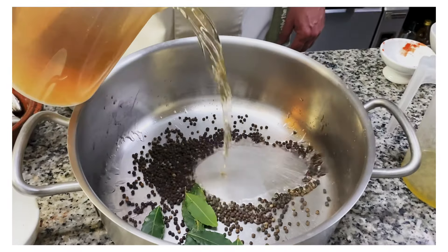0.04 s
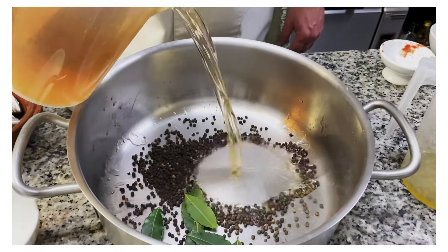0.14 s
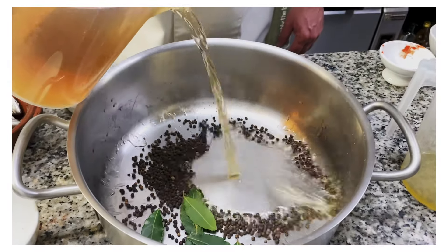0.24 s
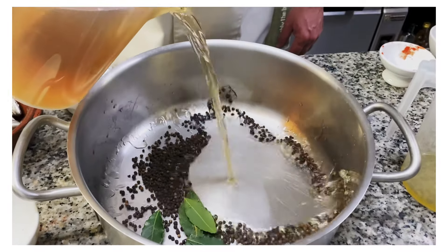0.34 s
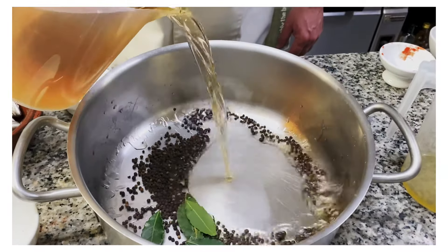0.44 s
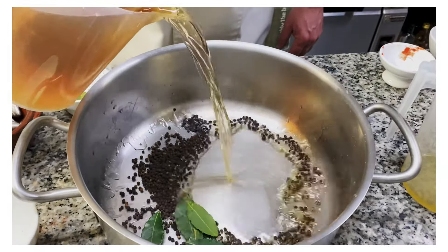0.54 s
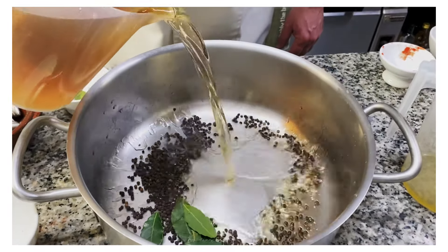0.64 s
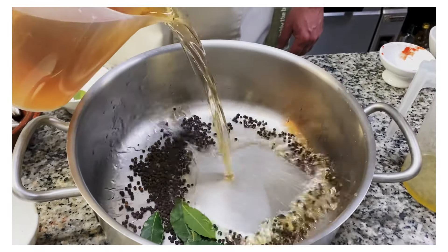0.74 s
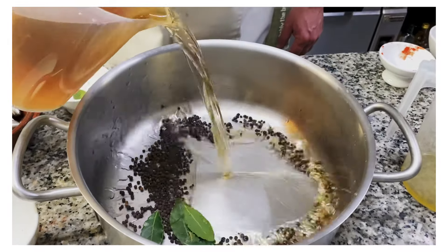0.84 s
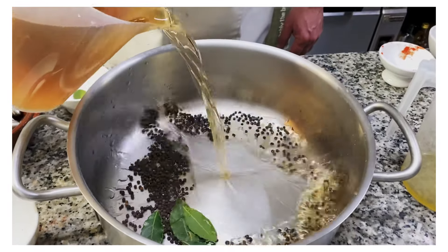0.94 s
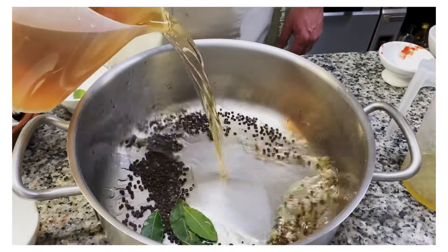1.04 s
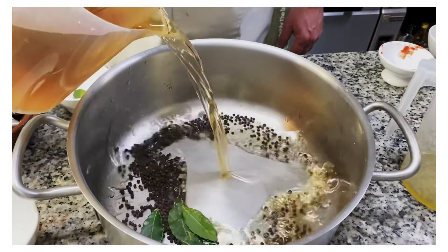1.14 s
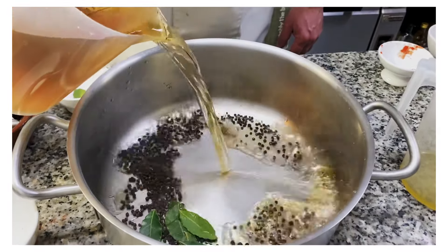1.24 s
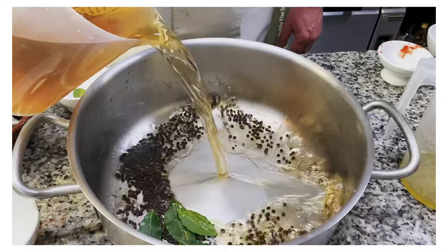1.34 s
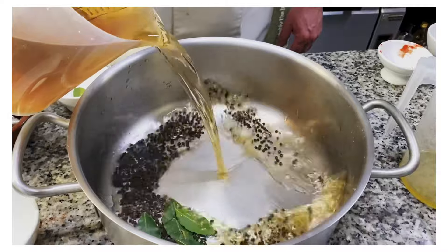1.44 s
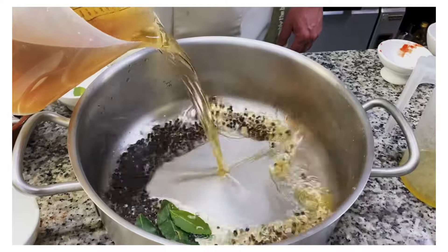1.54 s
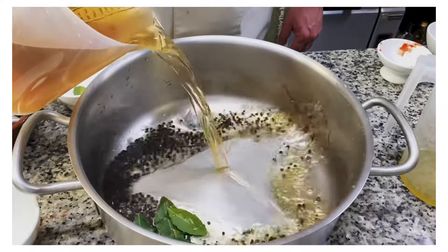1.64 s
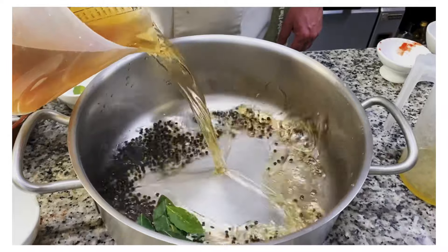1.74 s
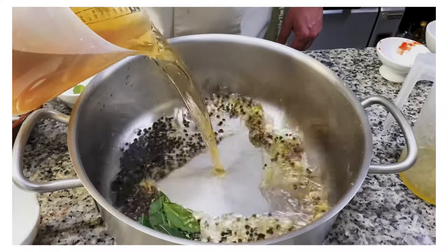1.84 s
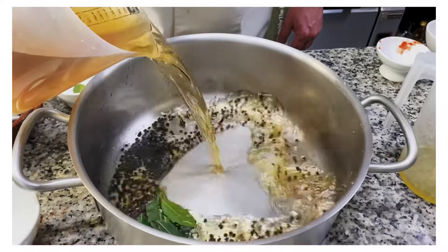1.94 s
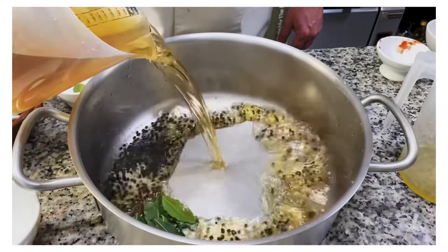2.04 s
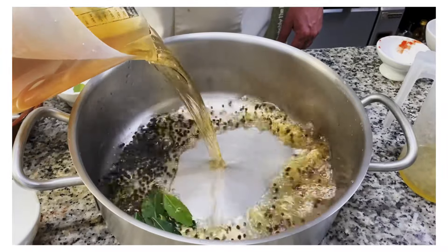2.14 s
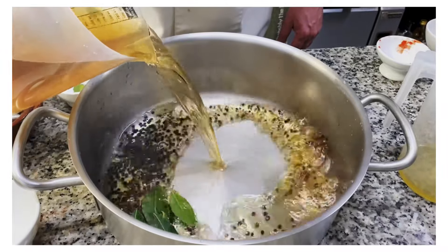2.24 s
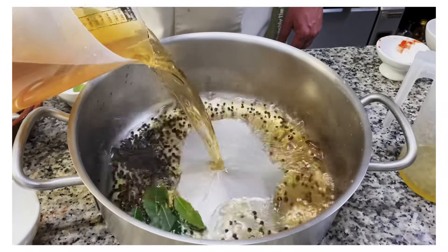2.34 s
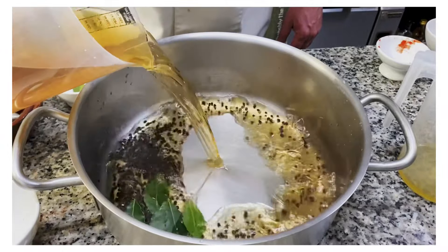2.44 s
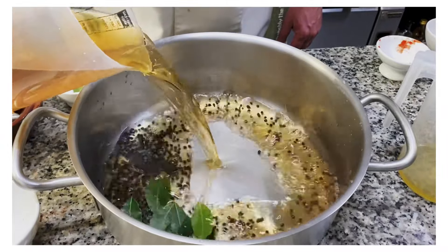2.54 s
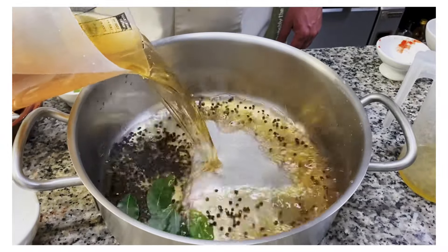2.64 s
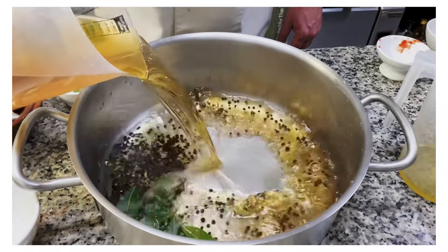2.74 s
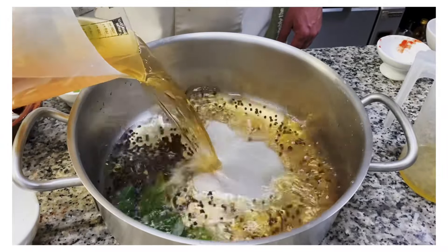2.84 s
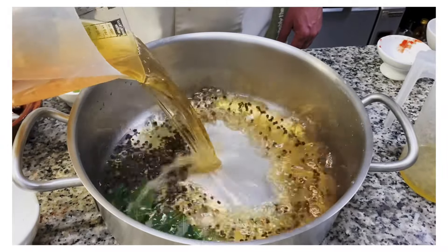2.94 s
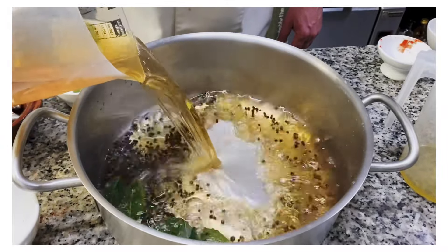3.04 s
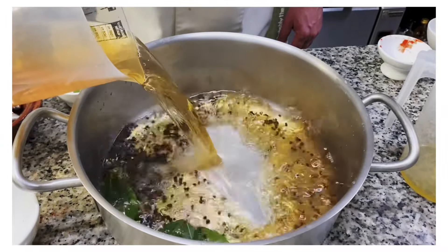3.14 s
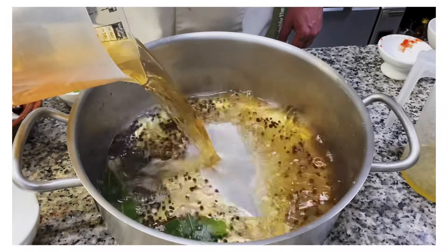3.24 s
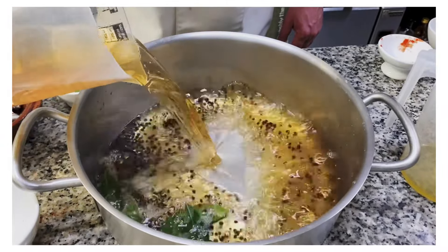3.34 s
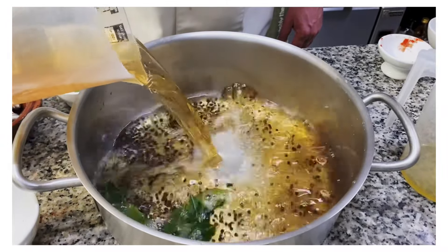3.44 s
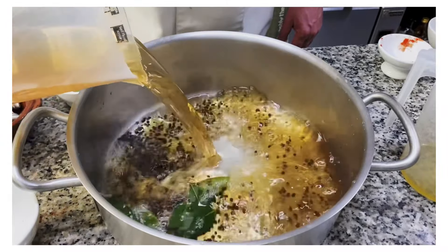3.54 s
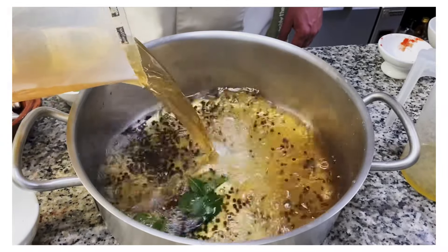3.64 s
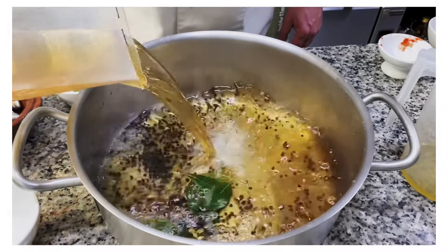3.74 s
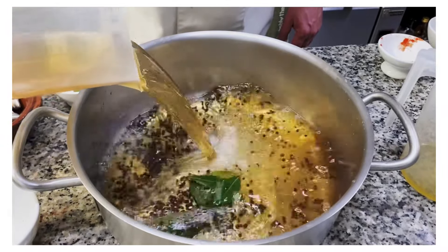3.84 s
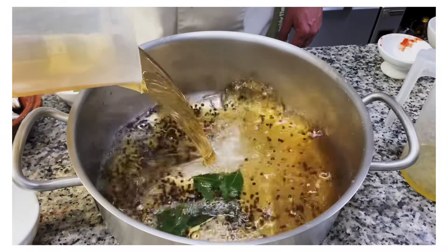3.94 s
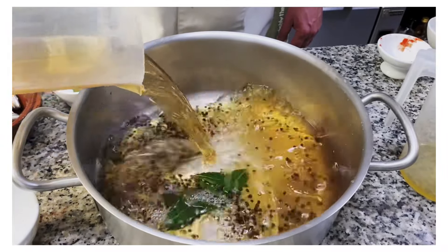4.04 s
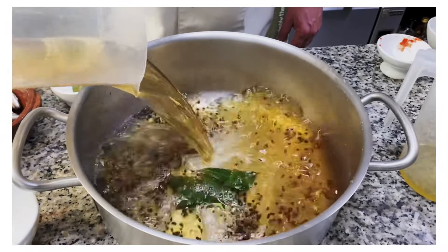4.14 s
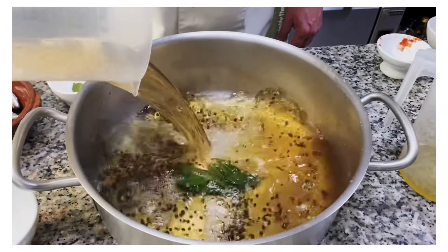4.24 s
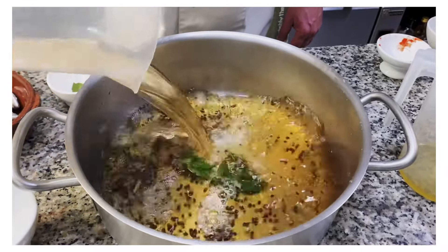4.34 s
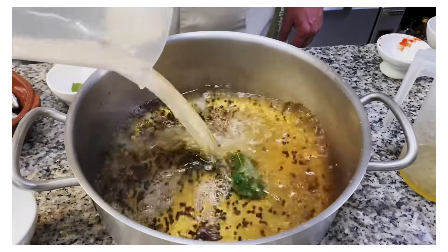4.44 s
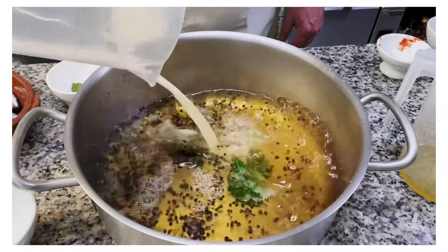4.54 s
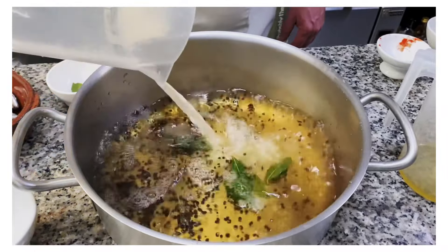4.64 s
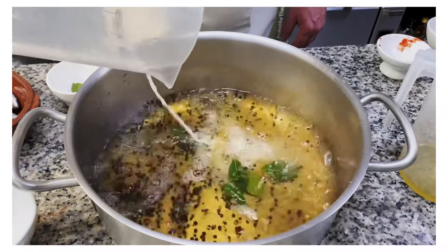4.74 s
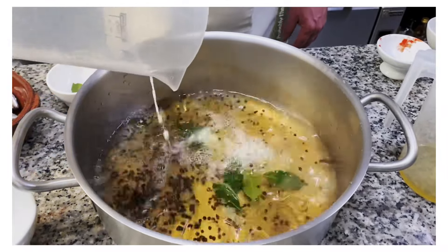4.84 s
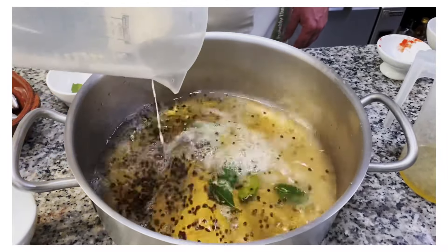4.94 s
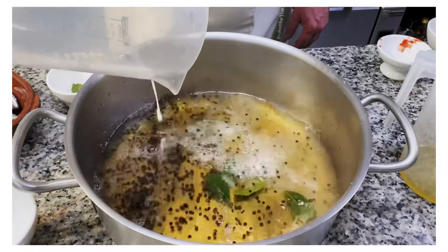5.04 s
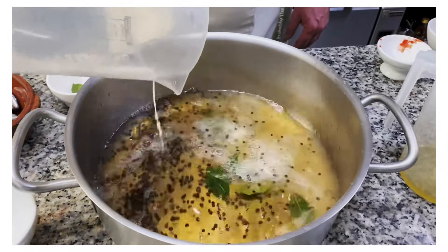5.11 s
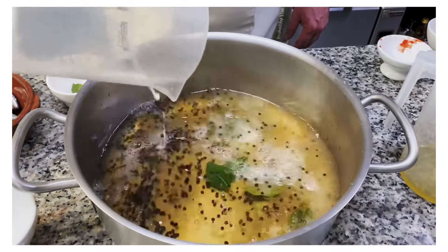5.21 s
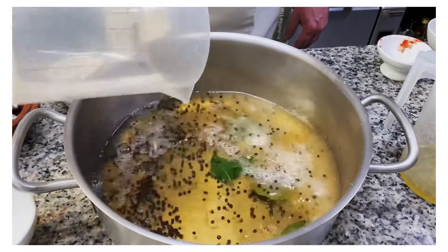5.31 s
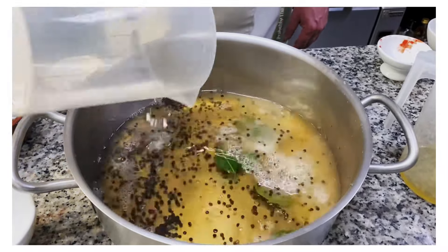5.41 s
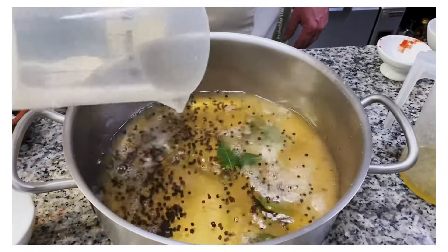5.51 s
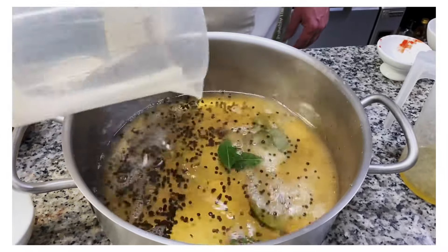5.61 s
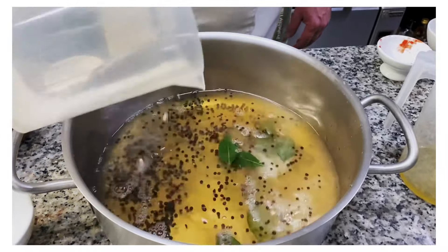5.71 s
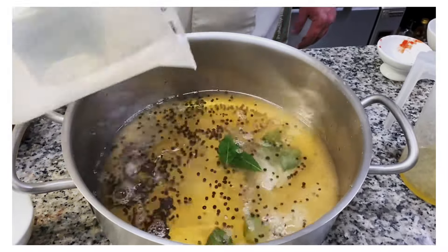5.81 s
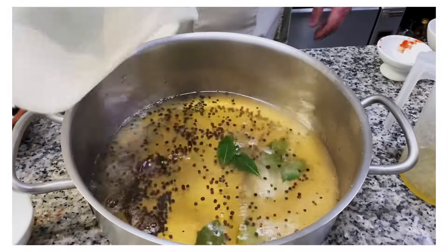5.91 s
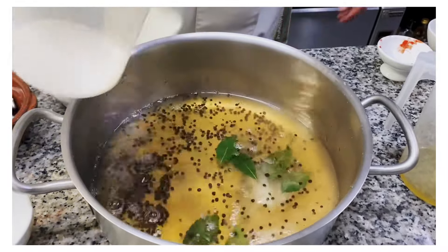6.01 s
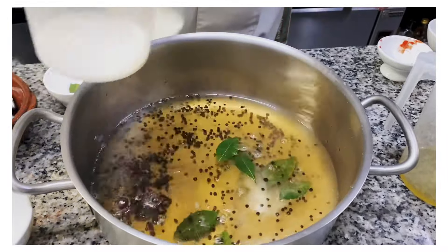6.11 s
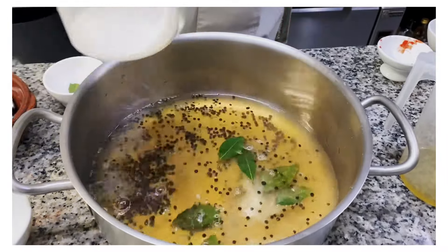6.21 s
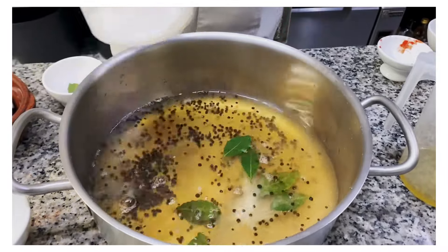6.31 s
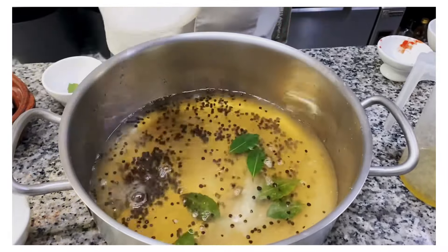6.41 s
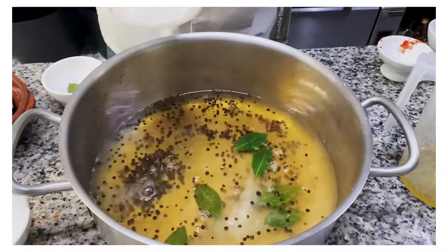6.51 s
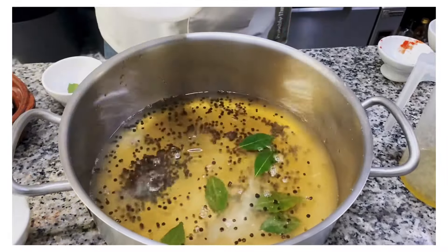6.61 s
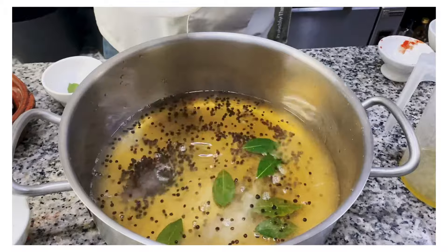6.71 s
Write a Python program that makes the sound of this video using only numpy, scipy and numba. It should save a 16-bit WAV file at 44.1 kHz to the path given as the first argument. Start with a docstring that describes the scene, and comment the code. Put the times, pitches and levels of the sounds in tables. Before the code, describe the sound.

Close, phone-like stereo pickup in a kitchen with quiet low rumble and dull air. Almost silent at first; from about 0.15 s liquid hits a bare steel pot with sharp plinks and a bright, thin sizzle. It dips around 0.4-0.6 s, then runs unevenly, with single bubbles chirping and plopping, notably near 0.75 and 1.3 s, and slight hollow pot ringing. It thins around 2.5 s. From 2.7 s the pour swells and, as a pool forms, becomes a thick, splashing gurgle with deep gulps around 3.0-3.3 s. It runs smoother around 3.8 s, then surges again at 4.3-4.7 s. A tiny high trill ends the stream by 4.85 s; scattered drips tick afterwards. A dull rub leads to a light knock at 5.15 s with a short wavering ring. Faint foam fizz fades, rising slightly at the end, with weak rubs near 6.4 and 6.7 s.

```python
"""A bright hiss, then a thick gurgle: vinegar is poured from a jug into a steel pot, heard close by.
Swarms of decaying sines, each a ringing air bubble, make the hiss, gurgle, last trill and foam fizz.
Single bubbles and noise-burst drops stand out, and resonant filters add the air modes of the pot.
A light modal knock and dull rubs on a phone's case follow, the foam fizzes on, and filtered noise
makes the low room rumble and kitchen air. Random echo tails stand for the walls and the kitchen."""
import sys
import numpy as np
from scipy import signal
from scipy.fft import rfft, irfft, next_fast_len
from scipy.io import wavfile
from scipy.ndimage import uniform_filter1d
from numba import njit

SR = 44100
rng = np.random.default_rng(int(sys.argv[2]) if len(sys.argv) > 2 else 0)


def generate_wav(signal):
    """Clip the signal to [-1, 1] and save it as 16-bit WAV at the path in sys.argv[1]."""
    frames = np.transpose(np.atleast_2d(signal))
    scaled = np.clip(frames, -1, 1) * 32767
    pcm = np.round(scaled).astype(np.int16)
    wavfile.write(sys.argv[1], SR, pcm)


N = 298538
TIME = np.arange(N) / SR
SIZE = next_fast_len(N, True)
FREQS = np.fft.rfftfreq(SIZE, 1 / SR)

# the pour lands, thins, steadies, swells twice as the jug tips, and runs out;
# levels before trim and draining: time_s, spray_level_db, gurgle_level_db
STREAM = [(0, -53, -91), (.135, -55.5, -99), (.16, -43, -49.5), (.3, -39.5, -48.5), (.42, -48, -73),
          (.52, -52, -68), (.68, -50, -56.5), (.82, -44, -65.5), (1.28, -42.5, -50), (1.53, -46, -52.5),
          (1.88, -44, -44.5), (2.05, -48, -51.5), (2.58, -51.5, -50.5), (2.72, -41.5, -48),
          (2.87, -42.5, -44.5), (2.96, -36, -45), (3.04, -42.5, -42), (3.11, -36, -38), (3.16, -39.5, -44),
          (3.22, -40, -41), (3.35, -42.5, -43.5), (3.62, -42, -42), (3.85, -45.5, -47.5), (4.1, -42, -43),
          (4.36, -40.5, -39), (4.43, -42, -40.5), (4.51, -40, -43), (4.58, -53, -43.5), (4.64, -43.5, -43),
          (4.67, -47.5, -49.5), (4.72, -40.5, -48.5), (4.82, -69, -53), (4.85, -65.5, -71.5)]


def undb(db):
    """Level is logarithmic: 20 dB is a factor of ten in amplitude."""
    return 10 ** (np.asarray(db) / 20)


def curve(table, axis=1):
    """Linear interpolation turns one column of a time table into a control signal."""
    rows = np.array(table)
    return np.interp(TIME, rows[:, 0], rows[:, axis])


def across(points):
    """Interpolation on a log-frequency axis joins (Hz, value) points."""
    hz, value = np.transpose(points)
    return np.interp(np.log(FREQS + 1), np.log(hz), value)


def unit(x):
    """Normalization by root mean square gives rms 1."""
    return x / np.sqrt(np.mean(x ** 2))


def colour(x, points):
    """Spectral shaping: multiplication in the frequency domain filters a sound, here to rms 1."""
    spectrum = rfft(x, SIZE) * undb(across(points))
    return unit(irfft(spectrum, SIZE)[..., :N])


def walk(rate):
    """Low-pass random fluctuation: held random values, smoothed, with a spread near 1."""
    k = max(int(SR / rate), 1)
    steps = np.repeat(rng.standard_normal(N // k + 1), k)
    return np.sqrt(1.5) * uniform_filter1d(steps, k)[:N]


def add(out, s, sound):
    """Superposition: mix a short sound in at time s."""
    i = int(np.clip(s * SR, 0, N - 1))
    out[i:i + len(sound)] += sound[:N - i]


def bubble(hz, life, rise):
    """Damped volume oscillation: a trapped air pocket rings, climbing in pitch near the surface."""
    age = np.arange(int(6 * life * SR) + 2) / (life * SR)  # in lives
    pitch = np.minimum(hz * (1 + rise * age), SR / 2)
    envelope = (1 - np.exp(-4 * age)) * np.exp(-age)
    return envelope * np.sin(2 * np.pi * np.cumsum(pitch) / SR)


@njit
def ring_all(start, hz, gain, life, rise):
    """Rotating phasors: sum many bubbles, each swelling, climbing in pitch and dying away."""
    out = np.zeros(N)
    for k in range(len(start)):
        step = 1 / (life[k] * SR)
        turn = np.exp(2j * np.pi * hz[k] / SR - step)
        climb = np.exp(2j * np.pi * hz[k] / SR * rise[k] * step)
        z, closed, opening = gain[k] + 0j, 1., np.exp(-4 * step)
        for i in range(start[k], min(start[k] + int(6 / step), N)):
            out[i] += (1 - closed) * z.imag
            z, turn, closed = z * turn, turn * climb, closed * opening
    return out


def swarm(count, low_hz, high_hz, cycles, rise, spread_db):
    """Random superposition: many bubbles of random size and time, ringing a few cycles; rms 1."""
    when, size, damping, glide, strength = rng.random((count, 5)).T
    hz = low_hz * (high_hz / low_hz) ** size
    gain = undb(-spread_db * np.log(strength + 0.0074)) * hz / high_hz
    life = cycles * (.5 + damping) / hz
    start = (when * N).astype(np.int64)
    return unit(ring_all(start, hz, gain, life, rise * (0.18 + glide)))


def resonate(x, modes):
    """Modal resonance: a hollow body adds ringing at its own frequencies to the sound."""
    ringing = sum(undb(db) * signal.lfilter(*signal.iirpeak(hz, hz / width, fs=SR), x)
                  for hz, width, db in modes)
    return x + ringing


def depth(t):
    """Sigmoid transition: share of the stream landing in liquid as the pool closes over the steel."""
    film_share, pool_share = 0.11, 0.7
    closes_s, closing_s = 2.76, 0.11
    closed = .5 + .5 * np.tanh((t - closes_s) / (2 * closing_s))
    return np.clip(film_share + (pool_share - film_share) * closed, 0, 1)


def by_depth(film, pool):
    """Power-preserving crossfade from the sound on bare steel to the sound in the pool."""
    share = depth(TIME)
    return np.sqrt(1 - share) * film + np.sqrt(share) * pool


def draining():
    """Exponential decay: the last thread of liquid dies away once the stream ends."""
    stream_end_s, drain_db_per_s = 4.73, 13.5
    return undb(-drain_db_per_s * np.maximum(TIME - stream_end_s, 0))


def spurts(count, life, spread_db):
    """Shot noise: lumps in the stream make a gain that jumps and falls back; rms 1."""
    when, strength = rng.random((count, 2)).T
    energy = undb(-spread_db * np.log(strength + 0.017)) ** 2
    lumps = np.bincount((when * N).astype(int), energy, N)
    return unit(np.sqrt(signal.lfilter([1], [1, -np.exp(-1 / (life * SR))], lumps)))


def spray():
    """Breakup into tiny resonators and noise: a bright sizzle on steel, a duller splash in the pool."""
    # spectrum on steel: frequency_hz, relative_db
    steel_colour = [(300, -32), (700, -18), (1500, -12), (3000, -4), (4500, 0), (5700, 0), (7000, -2.5),
                    (9000, -3), (11500, -6), (13000, -13), (14000, -20), (16000, -27)]
    # spectrum in the pool: frequency_hz, relative_db
    plunge_colour = [(300, -30), (700, -14), (1500, -6), (2500, 0), (3600, 1), (4500, 0), (6000, -3),
                     (7000, -6), (9000, -8), (11500, -13), (14000, -25), (16000, -35)]
    droplets = swarm(count=13000, low_hz=2200, high_hz=13000, cycles=5, rise=.07, spread_db=3.6)
    froth = swarm(count=12000, low_hz=1600, high_hz=12000, cycles=6, rise=.035, spread_db=2.3)
    hiss = undb(-9) * rng.standard_normal((2, N))
    sizzle = colour(droplets + hiss[0], steel_colour)
    plunge = colour(froth + hiss[1], plunge_colour)
    return by_depth(sizzle, plunge) * undb(curve(STREAM, axis=1) + 1.5) * draining()


def gurgle():
    """Air entrainment: dragged-under bubbles chirp in the thin film, crowd the pool, grow in a surge."""
    # spectrum of the smaller bubbles: frequency_hz, relative_db
    gurgle_colour = [(300, -31), (550, -15.5), (800, -6.5), (1300, 0), (2000, 3.5), (3000, 0.5),
                     (4500, -20), (8000, -31)]
    # deep bubbles come with the surges and the last gush; before trim and draining: time_s, level_db
    gulp_levels = [(0, -78), (2.6, -59.5), (2.86, -54), (2.97, -42), (3.05, -49), (3.11, -43), (3.16, -47),
                   (3.22, -44.5), (3.265, -47), (3.31, -42), (3.55, -51), (3.64, -48), (3.8, -71),
                   (4.27, -57.5), (4.34, -45.5), (4.41, -46), (4.55, -55.5), (4.66, -50.5), (4.7, -46),
                   (4.8, -55), (4.86, -76.5)]
    chirps = swarm(count=1000, low_hz=1000, high_hz=3400, cycles=7, rise=.15, spread_db=1.6)
    crowd = swarm(count=8000, low_hz=1000, high_hz=3770, cycles=5.5, rise=.05, spread_db=1.5)
    strays = swarm(count=380, low_hz=1100, high_hz=3000, cycles=8, rise=.14, spread_db=1)
    gulps = swarm(count=900, low_hz=695.5, high_hz=1357, cycles=3.54, rise=0.1, spread_db=0.8)
    bubbles = colour(by_depth(chirps + undb(-1.5) * strays, crowd), gurgle_colour)
    bubbles = bubbles * undb(curve(STREAM, axis=2) - 2.0)
    return (bubbles + gulps * undb(curve(gulp_levels) - 3.5)) * draining()


def plop_life(hz, s):
    """Damping grows with pitch, and the churning pool damps more than the film; life in seconds."""
    film_life_ms, pool_life_ms, slope = 6.41, 4.57, 0.9  # lives at 1000 Hz
    life_ms = film_life_ms + (pool_life_ms - film_life_ms) * depth(s)
    return life_ms * (1000 / hz) ** slope / 1000


def plops():
    """Single-bubble resonance: large bubbles stand out, shedding smaller ones mostly in the thin film."""
    # large bubbles; level before trim and pot: start_s, start_pitch_hz, level_db, rise_per_life (fraction)
    large_bubbles = [(.148, 4230, -21, 0.028), (.155, 5820, -18, 0.065), (0.16, 3880, -24, 0.008),
                     (.23, 3180, -23, 0), (.243, 2790, -18, 0.0039), (0.27, 781, -30.5, 0.018),
                     (.29, 5000, -23, 0.29), (0.308, 3200, -23.5, 0), (.624, 854, -41, 0.039),
                     (0.634, 1172, -32.5, 0), (.686, 2560, -43, 0.21), (0.701, 1340, -46, 0),
                     (.712, 2210, -33, 0.062), (0.718, 2070, -37, 0), (.733, 1158, -38, 0.048),
                     (0.757, 2330, -21.5, 0), (0.813, 2950, -29, 0.061), (0.82, 1620, -30.5, 0.2),
                     (.868, 2320, -42.5, 0), (.915, 2490, -32.5, 0.0042), (0.939, 880, -43.5, 0.36),
                     (0.953, 1107, -31.5, 0.15), (.965, 1740, -33.5, 0.097), (.987, 2480, -35, 0.069),
                     (1.014, 2200, -32, 0.11), (1.043, 1600, -35, 0.062), (1.06, 2410, -27.5, 0.17),
                     (1.105, 2500, -31, 0.023), (1.111, 1280, -32.5, 0.54), (1.12, 1560, -36.5, 0),
                     (1.152, 1220, -43.5, .06), (1.214, 1270, -27.5, 0.0037), (1.231, 880, -39, 0),
                     (1.27, 754, -19, 0.19), (1.284, 1082, -16.5, 0.24), (1.311, 2165, -29.5, 0.086),
                     (1.31, 1370, -32, 0.23), (1.376, 2400, -29.5, 0), (1.398, 1470, -31, 0),
                     (1.43, 4700, -24, 0.062), (1.462, 3260, -24.5, 0.071), (1.471, 1496, -28, 0.013),
                     (1.472, 760, -39.5, 0.04), (1.52, 1168, -30, 0.037), (1.584, 1124, -27.5, 0.48),
                     (1.617, 1290, -31, 0.034), (1.708, 1040, -28.5, 0.052), (1.734, 2390, -22.5, 0.3),
                     (1.754, 1393, -28, 0), (1.758, 657, -34.5, 0.11), (1.818, 1190, -30.5, 0.14),
                     (1.835, 2490, -25.5, 0.2), (1.871, 2400, -24.5, 0), (1.878, 913, -33.5, 0.18),
                     (1.894, 487, -37, 0.45), (1.915, 760, -31, 0.015), (1.922, 5560, -22.5, 0),
                     (1.929, 836, -27.5, 0.023), (1.937, 1310, -35, 0.02), (1.962, 900, -34.5, 0.24),
                     (2.035, 1475, -29, 0.04), (2.094, 1600, -30, 0.041), (2.139, 1790, -30.5, 0.055),
                     (2.153, 1240, -33.5, 0.082), (2.157, 790, -44.5, 0.036), (2.247, 3630, -25, 0.13),
                     (2.277, 2100, -31, 0.063), (2.299, 4800, -23, 0), (2.303, 557, -46.5, 0.2),
                     (2.481, 1550, -38, 0.0035), (2.527, 1390, -42, 0.0061), (2.564, 1500, -36, 0.021),
                     (2.633, 1570, -33.5, 0.088), (2.753, 2106, -24, 0), (2.807, 2250, -27, 0),
                     (2.933, 920, -33, 0.17), (2.951, 2030, -24, 0), (2.954, 4270, -15, 0),
                     (2.968, 1160, -21.5, 0), (2.974, 2280, -20, 0.00011), (2.979, 3330, -18.5, 0.084),
                     (3.013, 3300, -25, 0.088), (3.016, 1220, -27.5, 0), (3.078, 1970, -20.5, 0.062),
                     (3.091, 1265, -23, 0.28), (3.102, 1327, -25.5, 0.092), (3.106, 807, -34.5, 0),
                     (3.198, 764, -32, 0.015), (3.203, 3050, -20.5, 0.098), (3.215, 1210, -25, 0.12),
                     (3.233, 1160, -22.5, 0.01), (3.244, 3450, -19.5, 0), (3.245, 856, -27, 0.056),
                     (3.274, 810, -24.5, 0.14), (3.276, 1180, -24.5, 0.035), (3.285, 724, -25, 0.016),
                     (3.301, 736, -30.5, 0), (3.364, 1990, -27, 0.02), (3.377, 1120, -29, 0.13),
                     (3.378, 496, -37.5, 0.3), (3.398, 1380, -29, 0.038), (3.496, 1170, -34, 0.056),
                     (3.498, 2500, -26, 0.00016), (3.58, 1510, -31, 0.015), (3.588, 2340, -23, 0.21),
                     (3.633, 750, -34.5, 0.45), (3.687, 1410, -28.5, 0), (3.901, 1170, -35, 0.24),
                     (4.027, 3000, -23, 0.029), (4.139, 1460, -28.5, 0.32), (4.182, 2160, -23, 0),
                     (4.209, 2560, -23, 0), (4.326, 930, -22.5, .15), (4.328, 2500, -17, 0.09),
                     (4.347, 920, -27, 0.23), (4.369, 1525, -19.5, 0.06), (4.43, 2880, -28, 0),
                     (4.439, 1207, -19.5, 0.0082), (4.499, 3300, -18, 0.1), (4.5, 2440, -18.5, 0.33),
                     (4.548, 1940, -18, 0.013), (4.581, 2700, -27, .12), (4.604, 492, -23.5, 0.084),
                     (4.612, 562, -34, 0.097), (4.617, 2440, -22.5, 0.023), (4.644, 860, -40.5, 0.0075),
                     (4.645, 4050, -25, 0.12), (4.677, 3000, -23, 0.018), (4.686, 784, -33.5, 0.12),
                     (4.688, 1880, -30, 0), (4.706, 3860, -17, 0.05), (4.709, 3970, -27, 0.087),
                     (4.733, 4380, -24.5, .03), (4.729, 1370, -39, 0.056), (4.813, 1786, -30.5, 0.31),
                     (5.305, 2250, -54.5, 0.31)]
    trim_db = -2.5
    satellite_db, max_lag_s, max_octaves = -10, .045, 1.1
    out = np.zeros(N)
    chances = rng.random((len(large_bubbles), 3, 3))
    for (s, hz, db, rise), satellites in zip(large_bubbles, chances):
        level = undb(db + trim_db)
        add(out, s, level * bubble(hz, plop_life(hz, s), rise))
        satellite_gain = level * undb(satellite_db) * (1 - depth(s))
        for lag, size, glide in satellites:
            pitch = hz * 2 ** (max_octaves * np.sqrt(size))
            small = bubble(pitch, plop_life(pitch, s), .15 * glide)
            add(out, s + max_lag_s * lag, satellite_gain * small)
    return out


def drops():
    """Impact excitation: each drop is a very short noise burst, a crack around one pitch."""
    # drops that smack on steel or liquid; peak before the pot: start_s, peak_db, pitch_hz, life_ms
    smacks = [(0.068, -31, 7450, 5.2), (.171, -22.5, 7700, 1.2), (.566, -29, 5550, 2.5),
              (0.818, -24.5, 5600, 1.4), (0.894, -19.5, 8900, 0.62), (1.3, -22.5, 5540, 1.8),
              (1.583, -29, 5900, 5), (2.752, -27, 3600, 4.1), (2.789, -25, 4440, 2.1),
              (2.855, -27, 4200, 1.8), (2.882, -21, 4370, 1.7), (2.938, -23.5, 4800, 6),
              (3.013, -19, 4000, 3), (3.032, -30, 4220, 1.8), (3.059, -22.5, 4000, 3),
              (3.125, -20, 3500, 1.6), (3.216, -23.5, 3280, 2.5), (3.415, -20, 4050, 2),
              (3.463, -21.5, 5600, 4.5), (4.381, -19.5, 9400, 3.2), (4.474, -23.5, 3060, 1.3),
              (4.497, -25, 4370, 2.6), (4.545, -20.5, 5500, 0.86), (4.579, -28, 2410, 2.3),
              (4.605, -16, 10800, 2.2), (4.769, -29, 4280, 1), (4.784, -39, 4500, 0.71),
              (4.801, -30, 4300, 0.99), (4.819, -30, 4000, 1), (4.863, -40, 3860, 1.7),
              (4.893, -27, 9600, 1.1), (4.91, -37.5, 4350, 1.7), (4.956, -28.5, 4960, 0.72),
              (5.343, -27, 10400, 2.2), (5.471, -29, 7630, 0.56), (6.522, -50, 6040, 4.7)]
    attack_ms = 0.6
    out, t = np.zeros(N), TIME[:1024]
    soften = signal.butter(8, 14000, fs=SR, output="sos")
    for s, db, hz, life_ms in smacks:
        band = signal.iirpeak(hz, 1.1, fs=SR)
        envelope = np.exp(-t * 1000 / life_ms) * (1 - np.exp(-t * 1000 / attack_ms))
        burst = rng.standard_normal(len(t)) * envelope
        crack = signal.lfilter(*band, signal.lfilter(*band, burst))
        crack = signal.sosfilt(soften, crack)
        thin = signal.butter(4, min(hz / 2, 4500), "high", fs=SR, output="sos")
        crack = signal.sosfilt(thin, crack)
        add(out, s, undb(db) * crack / np.abs(crack).max())
    return out


def thread():
    """Jet breakup: beads each trap a tiny bubble of nearly the same size, a narrow, high trill."""
    start_s, end_s, fade_s = 4.7, 4.83, 0.03
    level_db, fall_db_per_s = -44, 75
    beads = swarm(count=3000, low_hz=4030, high_hz=4640, cycles=13.0, rise=0.015, spread_db=-3.0)
    age = (TIME - start_s).clip(0)
    running = (np.minimum(age, end_s - TIME) / fade_s).clip(0, 1)
    return beads * running * undb(level_db - fall_db_per_s * age)


def foam():
    """Many weak independent sources: minute bubbles burst on the surface as a flickering fizz."""
    # fizz level before trim and flicker: time_s, level_db
    fizz_levels = [(4.9, -58), (5.45, -62), (6.2, -72.5), (6.77, -66)]
    # spectrum of the fizz: frequency_hz, relative_db
    fizz_colour = [(400, -24), (1000, -19), (2000, -13), (3000, -13), (4400, -2), (5600, -2), (8000, 0),
                   (11000, -1), (14000, -13), (16000, -19)]
    pops = swarm(count=9000, low_hz=2840, high_hz=13460, cycles=6.8, rise=0.17, spread_db=3.5)
    fizz = colour(pops + rng.standard_normal(N), fizz_colour)
    flicker_db = 1.3 * walk(20)
    fade_in = np.interp(TIME, [4.5, 5.2], [0, 1])
    return fizz * undb(curve(fizz_levels) + 2.0 + flicker_db) * fade_in


def wavering_tone(hz, t60):
    """Exponentially damped vibration whose pitch wavers; one second long."""
    phase = 2 * np.pi * np.cumsum(hz + 26 * walk(94)[:SR]) / SR
    return undb(-60 * TIME[:SR] / t60) * np.sin(phase)


def knock():
    """Modal impact: a light blow excites damped modes, and two close ones beat as they ring."""
    # modes of the body, levels before the blow's level: pitch_hz, level_db, t60_s
    body_modes = [(830, -5, .1), (1090, 5, .06), (1290, -1, .04), (1490, 6, .04), (1933, -14, .15),
                  (2342, -13, .17)]
    # the longest ring bends in pitch, before waver: time_after_blow_s, pitch_hz
    ring_bend = [(0, 1070), (.035, 1040), (.056, 1170), (.075, 1100), (.095, 1020), (.14, 1060)]
    knock_s, body_db = 5.149, -46.5
    ring_db, ring_t60_s = -54, .56
    twin_offset_hz, twin_db = 42, -12
    out, t = np.zeros(N), TIME[:SR]
    body = sum(undb(db) * wavering_tone(hz, t60) for hz, db, t60 in body_modes)
    bend = curve(ring_bend)[:SR]
    twin = undb(twin_db) * wavering_tone(bend + twin_offset_hz, ring_t60_s)
    pair = wavering_tone(bend, ring_t60_s) + twin
    ring = undb(ring_db + 2 * walk(58)[:SR]) * pair
    click = rng.standard_normal(len(t)) * np.exp(-t / 0.0035)
    contact = signal.lfilter(*signal.butter(2, [900, 2600], "band", fs=SR), click)
    add(out, knock_s, undb(body_db) * body + ring + undb(-33.0) * contact)
    return out


def rub():
    """Friction excitation: uneven slips of a hand thud through the phone's case and make it drone."""
    # strokes, before the uneven gain: start_s, end_s, level_db, swell_db_per_s
    strokes = [(4.828, 5.156, -59, 10), (6.33, 6.57, -69, 3), (6.664, 6.756, -62.5, -2)]
    # resonances added by the case: frequency_hz, width_hz, added_db
    case_modes = [(82, 14, 5), (131.6, 8.1, 10.5), (162, 13, 3.5)]
    # spectrum of the rub: frequency_hz, relative_db
    rub_colour = [(30, -17), (60, 6), (85, -2), (140, -2.5), (200, -6.5), (340, -6), (450, -13),
                  (1200, -41)]
    attack_s, release_s = 0.045, 0.052
    slips = swarm(count=1100, low_hz=94, high_hz=420, cycles=1.0, rise=0, spread_db=0.5)
    touch = np.zeros(N)
    for start, end, db, swell in strokes:
        contact = np.minimum((TIME - start) / attack_s, (end - TIME) / release_s).clip(0, 1)
        touch += contact * undb(db + swell * (TIME - start))
    uneven = undb(1.8 * walk(22))
    return colour(resonate(slips, case_modes), rub_colour) * touch * uneven


def echoes(x, t60, delay, db):
    """Diffuse reverberation: dense decaying reflections, different at each port, with shifting paths."""
    t, out = TIME[:SR // 3], 0
    shares = np.array([walk(25) for _ in range(6)])
    for share in shares / np.sqrt(np.sum(shares ** 2, axis=0)):
        tail = rng.standard_normal((2, len(t))) * undb(-60 * t / t60) * (t > delay)
        tail = signal.sosfilt(signal.butter(1, 7000, fs=SR, output="sos"), tail)
        tail = tail / np.sqrt(np.sum(tail ** 2, axis=1, keepdims=True))
        out = out + signal.oaconvolve((x * share)[None], tail, axes=1)[:, :N]
    return undb(db) * out


def ports(x):
    """Interaural-style cues: phase and level differ between two microphone ports with frequency."""
    # phase by which the left leads: frequency_hz, lead_rad
    port_phase = [(100, 0), (380, -.2), (520, -.7), (760, .35), (950, 0), (2000, 0), (2850, .9), (3600, .6),
                  (5000, 1.6), (6000, 1.6), (7200, 2.3), (8500, 3.0), (10000, 3.14), (11500, 3.25),
                  (13500, 4.0), (16000, 6.2)]
    # left minus right: frequency_hz, difference_db
    port_balance = [(150, 3), (480, 5.5), (780, 1.5), (1050, 2.5), (2000, -0.5), (2700, -2.5), (4000, -3),
                    (5500, 0)]
    half = np.exp(.5j * across(port_phase)) * undb(across(port_balance) / 2)
    return irfft(rfft(x, SIZE) * np.array([half, 1 / half]), SIZE)[:, :N]


def background():
    """Partly coherent noise: low rumble and dull kitchen air share much of their signal at both ports."""
    # rumble level before fluctuation: time_s, level_db
    rumble_levels = [(0, -67), (1.2, -64.5), (2.64, -65), (2.82, -79), (3.08, -66), (3.5, -77),
                     (3.7, -66.5), (4.6, -67.5), (5.4, -72), (6.2, -74), (6.72, -66)]
    # kitchen air level before fluctuation: time_s, level_db
    air_levels = [(.28, -61), (.47, -70.5), (.75, -59.5), (1.2, -68.5), (1.9, -63.5), (2.2, -72),
                  (2.5, -73.5), (3.5, -66), (4.0, -74), (4.5, -63), (5.1, -65.5), (5.35, -74),
                  (5.72, -75.5), (5.93, -76), (6.2, -73.5), (6.5, -65)]
    # spectrum of the rumble: frequency_hz, relative_db
    rumble_colour = [(20, -28.5), (35, -17.5), (50, 5), (80, -1.5), (130, -1.5), (200, -5.5), (400, -40),
                     (1500, -64.5)]
    # spectrum of the air: frequency_hz, relative_db
    air_colour = [(80, -19), (180, -4.5), (300, 0), (450, -6.5), (650, -14.5), (1000, -16), (1300, -14),
                  (1650, -16.5), (2050, -15.5), (3000, -18.5), (8000, -55.5), (16000, -26)]
    shared, own = rng.standard_normal((2, N)), rng.standard_normal((2, 2, N))
    rumble = colour(shared[0] + 0.23 * own[0], rumble_colour)
    rumble = rumble * undb(curve(rumble_levels) + 2.1 * walk(9))
    air = colour(shared[1] + .5 * own[1], air_colour)
    air = air * undb(curve(air_levels) + 3.1 * walk(20))
    return rumble + air


def scene():
    """Source, resonator, room: liquid sounds ring in the pot, scatter off its walls and the kitchen."""
    # air resonances of the pot: frequency_hz, width_hz, added_db
    pot_modes = [(505, 11, 6), (701.7, 7.6, 7.5), (802, 55, 6.5), (1165, 43, -1), (1439, 74, -3),
                 (1906, 51, -10), (2464, 110, -10), (5545, 180, -4.5)]
    # the pool cushions the lumps of the stream into a smoother rush
    lumps = spurts(count=3200, life=.006, spread_db=1.7) ** (1 - .3 * depth(TIME))
    stream = (spray() + gurgle()) * lumps
    liquid = undb(-1.0) * (stream + thread() + foam()) + plops() + drops()
    near = resonate(liquid, pot_modes) + knock()
    # the steel walls scatter the upper middle range in all directions
    bright = signal.sosfilt(signal.butter(1, [2900, 6300], "band", fs=SR, output="sos"), near)
    walls = echoes(bright, t60=.12, delay=.001, db=-6.5)
    kitchen = echoes(near, t60=0.54, delay=0.0033, db=-18.5)
    # the scattered sound loses its highest treble
    scattered = signal.sosfilt(signal.butter(8, 7200, fs=SR, output="sos"), walls + kitchen)
    # one short echo pattern reaches the ports along with the direct sound
    close = near + echoes(near, t60=0.11, delay=0.0033, db=-13.5)[0]
    return ports(close) + scattered + rub() + background()


def record(dry):
    """Band limiting: a steep low-pass filter in the phone cuts the top above 15.9 kHz."""
    return signal.sosfilt(signal.ellip(8, .2, 70, 15900, fs=SR, output="sos"), dry)


dry = scene()
out = record(dry)
generate_wav(out)
```